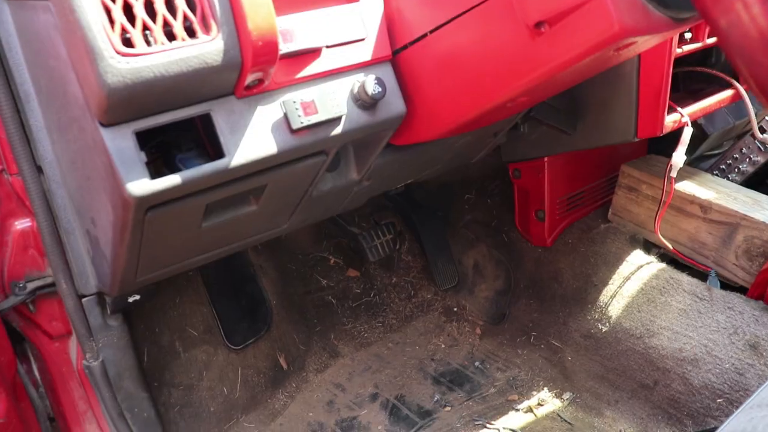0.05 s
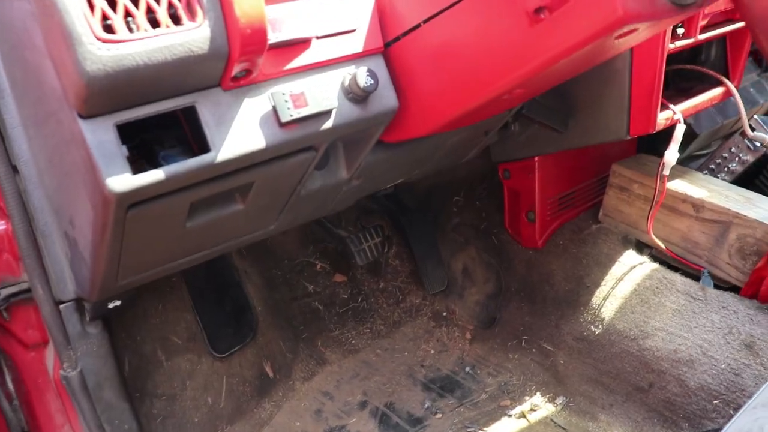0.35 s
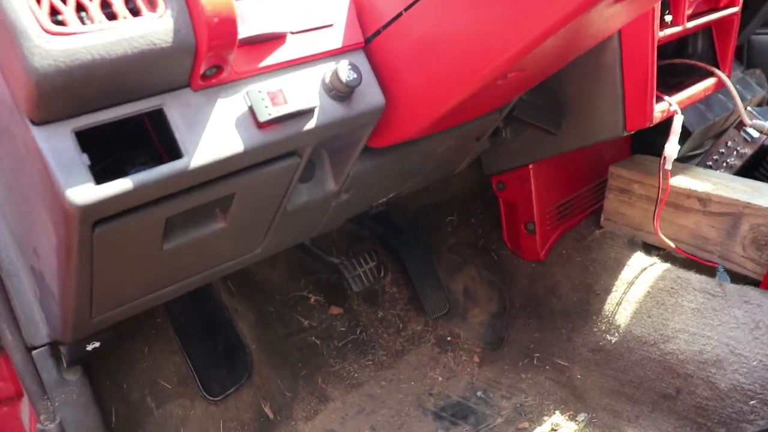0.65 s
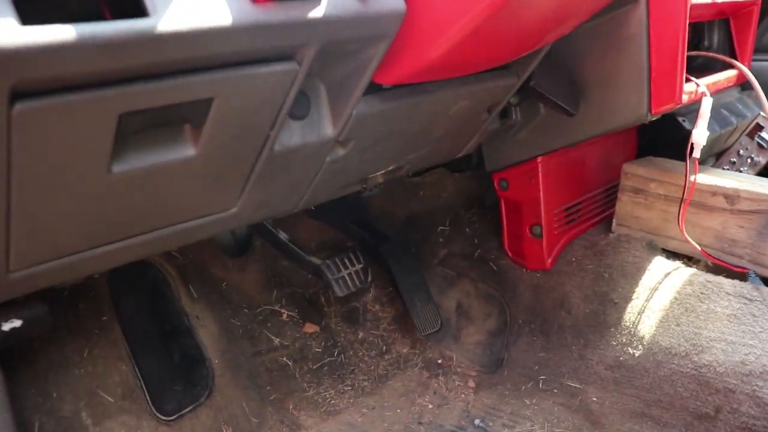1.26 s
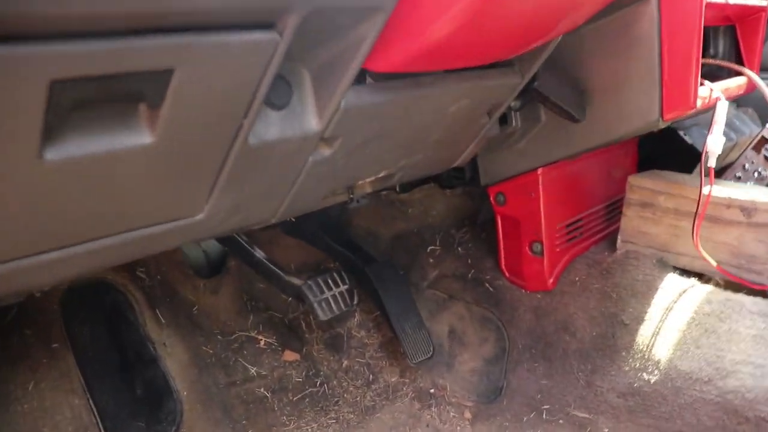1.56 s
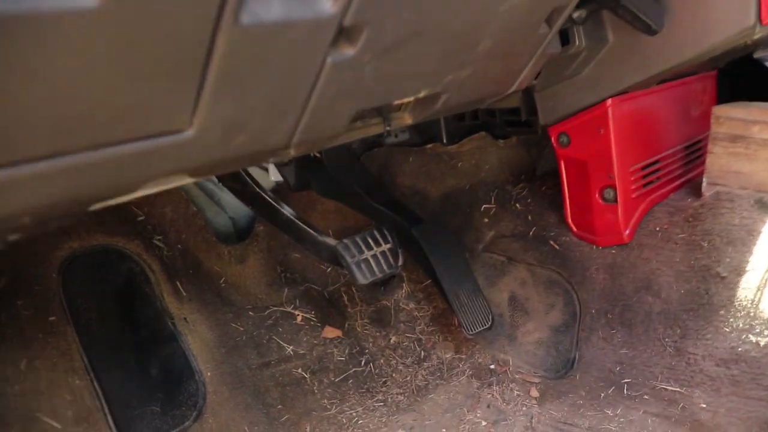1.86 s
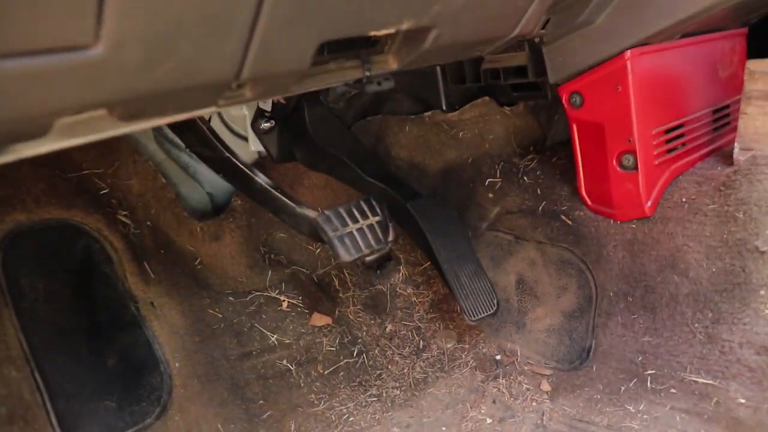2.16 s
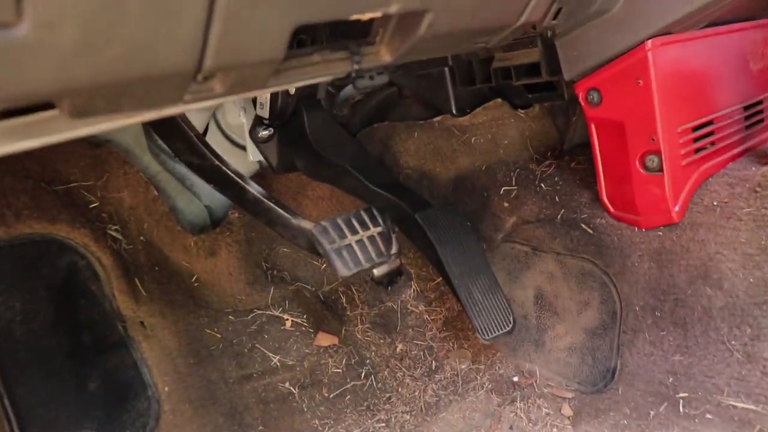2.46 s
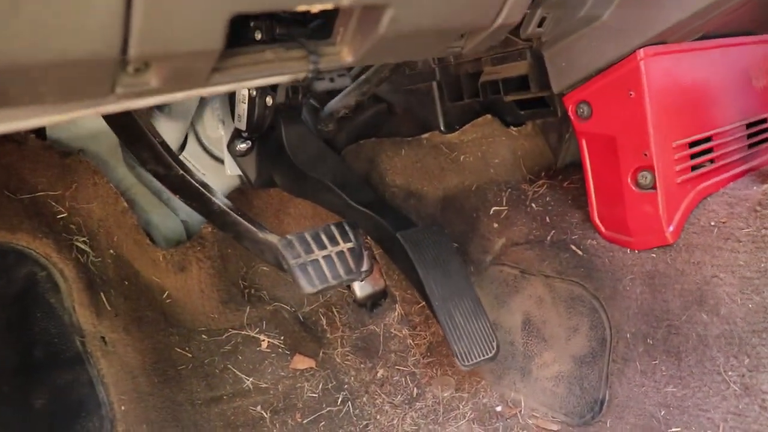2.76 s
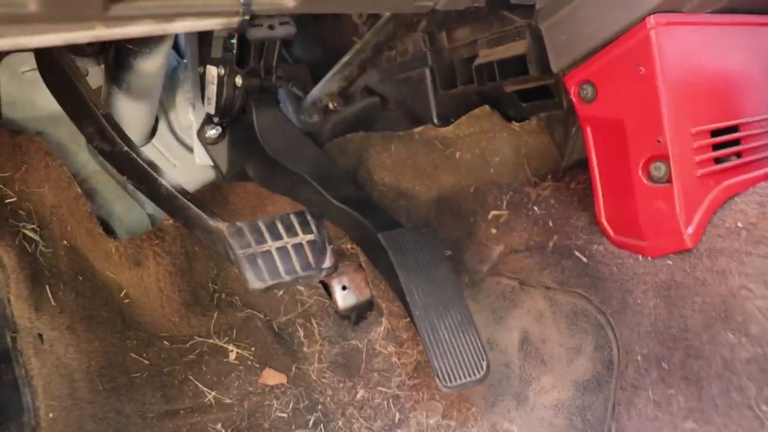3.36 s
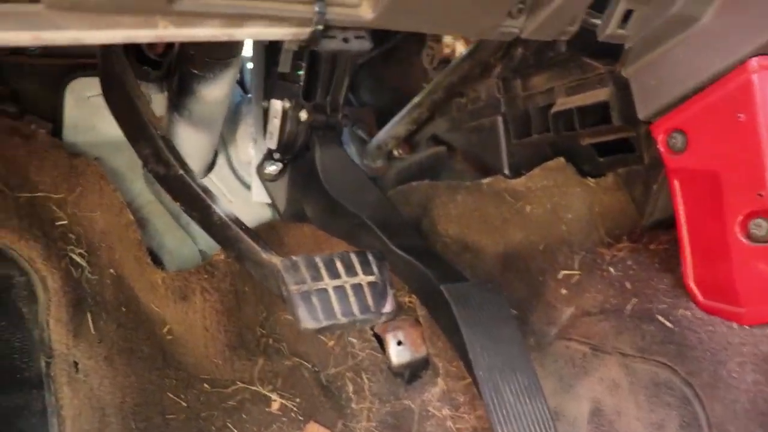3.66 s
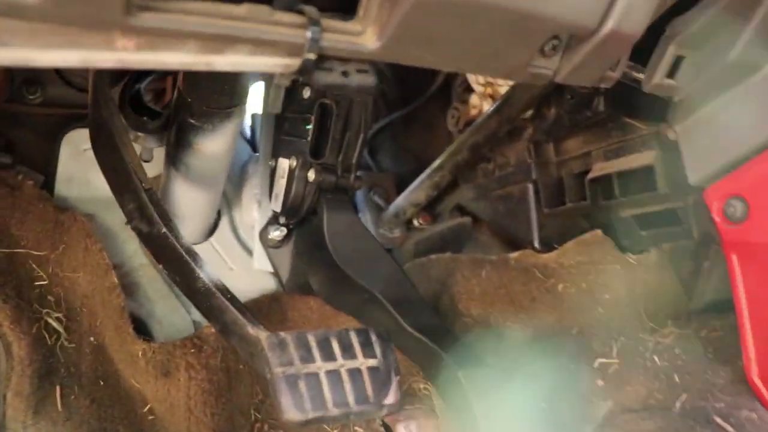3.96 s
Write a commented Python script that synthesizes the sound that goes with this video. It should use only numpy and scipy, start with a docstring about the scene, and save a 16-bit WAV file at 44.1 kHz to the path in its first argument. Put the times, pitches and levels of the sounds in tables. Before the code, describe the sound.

Sharp metallic ratchet clicks, slowing and hardening, come after a latch snap, a brief rolling slide and a padded thump inside a truck cab. Close microphone handling and rustling clothes open the scene, while a machine hums faintly nearby.

```python
"""Footwell of a parked truck; a machine hums nearby throughout. Fingers rub and tap the camera,
then clothes rustle, with two soft knocks. At 2 s a latch snaps open; something rolls along a rail,
clicks at its end and settles on a padded stop, booming a panel. From 3 s a pawl runs over ratchet
teeth, slowing as the clicks grow harder. Latch, rollers and pawl ring the same metal frame.
Last come a few small ticks and a faint scrape as the grip shifts."""
import sys
import numpy as np
from scipy import signal
from scipy.fft import rfft, irfft
from scipy.io import wavfile
from scipy.ndimage import uniform_filter1d

SR = 44100
rng = np.random.default_rng(int(sys.argv[2]) if len(sys.argv) > 2 else 0)


def int16_out(signal):
    """Quantize to a 16-bit WAV file."""
    q = np.round(np.clip(np.atleast_2d(signal).T, -1, 1) * 32767)
    wavfile.write(sys.argv[1], SR, q.astype(np.int16))


N = 176400
RING_SAMPLES, PORT_LAG_S, TOP_HZ, GRIT_DB = 27000, 0.0002, 15900, 2.5

# likeness of the two microphone ports: freq_hz, coherence
PORT_COHERENCE = [(60, 0.9), (1000, 0.96), (2000, 0.16), (4000, 0.03), (10000, 0.2)]
# machine hum: cycle_multiple, level_db
HUM_HARMONICS = [(4, -46), (5, -51), (7, -47.5), (8, -41), (9, -46.5)]
# hum swell: time_s, gain_db
HUM_SWELL = [(0, -6), (1.2, -0.5), (2.1, 1.5), (4, 4.5)]
# outdoor air: freq_hz, level_db
AIR_SPECTRUM = [(12, -67), (20, -45), (42, -2.5), (80, -6), (119, 0.5), (153, -6), (465, -14), (631, -16),
                (1870, -19.5), (3000, -27), (6360, -34), (15500, -47)]
# fingers rubbing: time_s, level_db, treble_db
RUB_STROKES = [(0.043, -32, -12), (.08, -37.5, -13), (.1, -41.5, -24), (.185, -40, -26), (.215, -34.5, -18),
               (0.236, -27.5, -9), (0.261, -29, -15), (0.305, -43.5, 1), (0.336, -37, 1.5),
               (0.359, -43, -7), (.425, -39.5, 1), (0.556, -32.5, -7.5), (.63, -49.5, -4.5),
               (0.684, -38, -5), (.78, -47, -2), (0.841, -48, 13.5), (.87, -64, 4)]
# skin friction: freq_hz, level_db
RUB_SPECTRUM = [(180, -7.5), (300, -7), (354, -7), (509, -15.5), (808, -1), (1460, -12.5), (1810, -13.5),
                (2440, -13), (4650, -11), (9140, -16), (15500, -33)]
# camera shell: freq_hz, width_hz, level_db
SHELL_MODES = [(832, 130, -10), (1847, 130, -13), (2300, 150, -24), (3320, 84, -17.5)]
# shell ring under finger pressure: time_s, gain_db
SHELL_DRIVE = [(.15, 3), (.26, 7.5), (.34, -5.5), (.8, -15)]
# taps: start_s, level_db, pitch_ratio, ring_ratio, pan_db
TAP_HITS = [(.3702, -2.5, 2.5, .4, -14), (.7798, 0, 1, .75, -16), (.8105, -14, .8, 2, -8),
            (3.8105, -14.5, 1, 1.8, 3), (3.879, -20, .75, 1.8, 0), (3.887, -20.5, 3.6, .4, 4)]
# tapped plastic: freq_hz, level_db, t60_s
PLASTIC_MODES = [(1280, -10, .011), (1750, -11, .007), (2400, -10, .009), (3150, -11, .008),
                 (3900, -15, .008), (5200, -21, .005)]
# clothes: time_s, level_db, treble_db
CLOTH_SWISHES = [(.85, -55.5, 21), (1.02, -48, 12.5), (1.15, -39.5, 2.5), (1.25, -51.5, 5),
                 (1.555, -38, -6), (1.577, -38, 17), (1.61, -43, 4), (1.661, -39.5, -8), (1.668, -26, 2),
                 (1.7, -42, 3), (1.77, -36.5, -3), (1.86, -49.5, -18), (2.66, -50, 11), (2.9, -74, 12),
                 (3.75, -47, 9), (3.83, -40, -7)]
# cloth friction: freq_hz, level_db
CLOTH_SPECTRUM = [(300, -4), (1100, 2.5), (2000, -1), (4000, -3.5), (6500, -11.5), (10000, -17.5),
                  (15500, -28)]
# shuffling on the seat: time_s, level_db
SEAT_LEVEL = [(1.25, -52), (1.35, -40), (1.68, -41.5), (1.75, -39), (1.82, -36), (1.9, -44.5), (2, -45)]
# seat friction: freq_hz, level_db
SEAT_SPECTRUM = [(100, -15), (200, 6.5), (500, -12), (1100, 1.5), (1600, -12), (4000, -49)]
# soft knocks: start_s, level_db, treble_db, crack_db
KNOCK_HITS = [(1.285, -12, 0, 10.5), (1.812, -16, -14, 10.5), (2.569, -4.5, 0, 6.5),
              (2.585, -1.5, -1.5, -18), (2.748, -23.5, -23, 11.5)]
# padded stop: freq_hz, crack_db, crack_t60_s, ring_db, ring_t60_s
PAD_BANDS = [(70, -60, .1, -30, 0.45), (168, -46, 0.17, -31, 0.6), (298, -33, 0.028, -30, 0.76),
             (696, -29, 0.32, -42, 0.44), (1460, -34, 0.071, -34.5, 0.48), (4500, -49, 0.072, -38, 0.23),
             (13000, -68, .05, -74, .2)]
# latch clicks: start_s, level_db, treble_db, crack_db
LATCH_HITS = [(1.9888, -0.5, -3, -2.5), (2.4405, -2.5, -17, -9)]
# latch body: freq_hz, crack_db, crack_t60_s, ring_db, ring_t60_s
LATCH_BANDS = [(120, -34, .05, -34, 0.35), (322, -21.5, 0.062, -36, 0.58), (710, -16, 0.063, -19.5, 0.17),
               (1090, -7.5, 0.061, -15.5, 0.15), (1970, -41, .04, -27.5, 0.31),
               (3220, -20, 0.035, -14, 0.091), (5070, -6.5, 0.053, -11.5, 0.12),
               (6460, -16, 0.058, -38, 0.16), (15000, -52, .025, -59, .08)]
# metal frame: freq_hz, struck_db, t60_s, rolled_db
FRAME_MODES = [(269, -31.5, 0.66, -69), (319.7, -25, 0.48, -34.5), (441.4, -28.5, 0.3, -62),
               (532.6, -29, 0.67, -61), (799, -30, 0.61, -60), (893, -23.5, 0.27, -67),
               (1047, -31.5, 0.51, -63), (1172, -39, 1, -34.5), (1298, -40.5, 0.65, -67),
               (1456, -38.5, 0.26, -66), (2440, -25, 0.28, -48), (2960, -22, 0.37, -52.5)]
# roller speed: time_s, turn_hz
ROLLER_SPEED = [(2.04, 110), (2.11, 100), (2.21, 102.5), (2.28, 116), (2.38, 97), (2.5, 110)]
# rolling: time_s, level_db
ROLL_LEVEL = [(2.045, -16), (2.08, -1), (2.12, -1), (2.245, -1), (2.28, -4), (2.345, -2.5), (2.41, -3),
              (2.44, -10), (2.5, -17), (2.54, -27)]
# rail: freq_hz, level_db
RAIL_SPECTRUM = [(53, -37), (90, -19), (118, -2), (167, -9.5), (322, 0.5), (387, -12), (439, -2),
                 (656, -7.5), (718, -3.5), (1150, -6), (1360, -15.5), (1890, -12.5), (2220, -25.5),
                 (4360, -29), (7000, -54), (15400, -115)]
# two rasping patches of rail: time_s, treble_db
RAIL_RASP = [(2.06, -1), (2.17, 14), (2.27, -2), (2.35, 11.5), (2.43, -1)]
# landing and bounce: start_s, level_db
THUD_HITS = [(2.571, -2.5), (2.585, 0)]
# panel at the stop: pitch_hz, level_db, t60_s
PANEL_MODES = [(185, -30.5, 0.4), (241, -31, .3), (288, -20, 0.19), (355, -33, 0.1), (404, -20.5, 0.094)]
# ratchet clicks: start_s, level_db, treble_db, crack_db
RATCHET_HITS = [(2.9945, -1, -38, -16), (3.0157, -5.5, 3.5, 6), (3.1178, 1, -21, -4.5),
                (3.1509, -1, -6, -5.5), (3.183, -4, -13.5, -15), (3.2098, -3.5, -4, -6.5),
                (3.2397, 0, -7, -4.5), (3.258, -12, -8, -16), (3.2712, -6, -2, -16), (3.3026, -5.5, -1, -1),
                (3.345, -2, -7, -0.5), (3.3919, -4.5, 1, 0.5), (3.4602, -1.5, -1.5, 0.5),
                (3.5266, -3.5, 0.5, 1), (3.6294, -4, 1, 4.5)]
# pawl on a tooth: freq_hz, crack_db, crack_t60_s, ring_db, ring_t60_s
PAWL_BANDS = [(118, -49, .05, -51, 0.52), (300, -23.5, 0.058, -34, 0.53), (590, -15, 0.042, -35.5, 1),
              (930, -14.5, 0.049, -32.5, 0.84), (1950, -19.5, 0.06, -26, 0.36),
              (2810, -16.5, 0.034, -18, 0.09), (4100, -5.5, 0.028, -16.5, 0.15),
              (5500, -8.5, 0.034, -16, 0.11), (6700, -19, 0.03, -23.5, 0.11),
              (8850, -5.5, 0.021, -29.5, 0.15), (9750, -22.5, 0.069, -47, 0.19),
              (12800, -16, 0.051, -36, 0.18), (14100, -27, .025, -48, .08)]
# pawl and bracket resonances: freq_hz, width_hz, boost_db
PAWL_MODES = [(1458, 47, 7.5), (2570, 150, 9.5), (2940, 99, 11.5), (3670, 190, 6), (4340, 190, 5),
              (4760, 98, 6), (5100, 220, 5), (5730, 130, 10), (6700, 200, 3), (8060, 330, 2),
              (8960, 450, 3)]
# teeth dragging under the pawl: time_s, level_db
DRAG_LEVEL = [(3.115, -38), (3.18, -26), (3.29, -32), (3.55, -42), (3.69, -32), (3.75, -43.5)]
# tooth friction: freq_hz, level_db
DRAG_SPECTRUM = [(200, -14), (320, -7), (600, -5), (830, -1), (1450, -7), (2500, -17), (5000, -25),
                 (9000, -46)]
# grip scrape: time_s, level_db
SCRAPE_LEVEL = [(3.905, -47), (3.95, -43.5), (3.965, -40.5), (4, -40.5)]
# scraped shell: freq_hz, width_hz, level_db
SCRAPE_MODES = [(1970, 240, 0), (2380, 410, 2), (4100, 790, -2)]
# mechanism, left minus right: freq_hz, pan_db
MECHANISM_PAN = [(100, -0.5), (1100, 2.5), (2200, -1), (4300, 1), (6000, 0.5), (9000, 6), (13000, 3)]


def undb(db):
    """Decibels to gain."""
    return 10 ** (np.asarray(db) / 20)


def unit(x):
    """Scale to rms 1."""
    return x / np.sqrt(np.mean(x ** 2))


def envelope(rows, fade_s=.025):
    """Gain through (time_s, level_db) points, fading outside them."""
    time_s, db = np.array(rows).T
    t = np.arange(N) / SR
    outside_s = np.abs(t - np.clip(t, time_s[0], time_s[-1]))
    return undb(np.interp(t, time_s, db)) * np.exp(-outside_s / fade_s)


def log_interp(f, hz, values):
    """Interpolate over log frequency."""
    return np.interp(np.log(f + 1), np.log(hz), values)


def pan(db):
    """Stereo gains for a left-minus-right level."""
    return undb(np.vstack([db, -db]) / 2)


def wander(rate_hz):
    """Smooth random motion, rms 1."""
    hold = max(int(SR / rate_hz), 2)
    steps = rng.standard_normal(N)[np.arange(N) // hold]
    return unit(uniform_filter1d(uniform_filter1d(steps, hold), hold))


def sine(cycles):
    """Sine with a random start phase."""
    return np.sin(2 * np.pi * (cycles + rng.random()))


def port_spectra(size):
    """White noise spectra at both ports: alike in the bass, the right one late."""
    f = np.fft.rfftfreq(size, 1 / SR)
    white = rfft(rng.standard_normal((3, size)))
    shared = np.clip(log_interp(f, *np.array(PORT_COHERENCE).T), 0, 1)
    pair = np.sqrt(shared) * white[0] + np.sqrt(1 - shared) * white[1:]
    return pair * np.exp(-2j * np.pi * f * np.array([[0], [PORT_LAG_S]]))


def tint(white, colour):
    """White spectrum to a signal of (freq_hz, level_db) colour, rms 1."""
    f = np.fft.rfftfreq(N, 1 / SR)
    hz, db = np.array(colour).T
    low_cut = 1 / np.sqrt(1 + (hz[0] / (f + 1)) ** 6)
    return unit(irfft(white * undb(log_interp(f, hz, db)) * low_cut, N))


def noise(colour):
    """Coloured stereo noise."""
    return tint(port_spectra(N), colour)


def resonate(x, modes):
    """Sum of driven (freq_hz, width_hz, level_db) resonances."""
    return sum(undb(db) * unit(signal.lfilter(*signal.iirpeak(hz, hz / width_hz, fs=SR), x))
               for hz, width_hz, db in modes)


def brighten(x, rows, corner_hz):
    """Treble shelf following (time_s, treble_db) points."""
    treble = signal.sosfiltfilt(signal.butter(1, corner_hz, "high", fs=SR, output="sos"), x)
    return x + treble * (envelope(rows) - 1)


def add(out, start_s, x):
    """Mix x in at start_s."""
    i = int(start_s * SR)
    out[:, i:i + x.shape[1]] += x[:, :N - i]


def background(cycle_hz=14.82, drift=0.003, waver_db=2, air_db=-39.5):
    """A machine hums on multiples of its cycle over quiet outdoor air."""
    cycles = np.cumsum(cycle_hz * (1 + drift * wander(2.9))) / SR
    hum = sum(undb(db + waver_db * wander(7.37)) * np.sqrt(2) * sine(k * cycles)
              for k, db in HUM_HARMONICS)
    return hum * envelope(HUM_SWELL) + undb(air_db) * noise(AIR_SPECTRUM)


def fingers(catches_per_s=1300, spread_db=2.5, catch_share=.55, gain_db=2.5, pan_db=-11.5):
    """Skin slides and catches on the shell by the right port; light strokes are brighter."""
    strokes = np.array(RUB_STROKES)
    catches = (rng.random(N) < catches_per_s / SR) * undb(spread_db * rng.standard_normal(N))
    catches = unit(catches * rng.choice([-1, 1], (2, N)))
    slide = unit(rng.standard_normal((2, N)) * undb(GRIT_DB * wander(1500)))
    force = np.sqrt(catch_share) * catches + np.sqrt(1 - catch_share) * slide
    shell = resonate(force, SHELL_MODES) * envelope(SHELL_DRIVE)
    scratch = brighten(tint(rfft(force), RUB_SPECTRUM), strokes[:, [0, 2]], corner_hz=5000)
    return (scratch + shell) * envelope(strokes[:, :2]) * undb(gain_db) * pan(pan_db)


def taps(snap_db=-17, snap_s=.0007, base_low_hz=1000, base_high_hz=6500):
    """Dry ticks of plastic: a snap and a few modes, no bass."""
    out, t = np.zeros((2, N)), np.arange(SR // 20) / SR
    for start_s, level_db, pitch, ring, pan_db in TAP_HITS:
        modes = sum((hz * pitch < TOP_HZ) * undb(db - 60 * t / (t60_s * ring)) * sine(hz * pitch * t)
                    for hz, db, t60_s in PLASTIC_MODES)
        hiss = uniform_filter1d(rng.standard_normal((2, len(t))), size=3)
        snap = undb(snap_db) * np.exp(-t / snap_s) * hiss
        highpass = signal.butter(4, base_low_hz * pitch, "high", fs=SR, output="sos")
        lowpass = signal.butter(2, min(base_high_hz * np.sqrt(pitch), TOP_HZ), fs=SR)
        tick = signal.lfilter(*lowpass, signal.sosfilt(highpass, modes + snap))
        add(out, start_s, undb(level_db) * tick * pan(pan_db) / 2)
    return out


def clothes(grain_db=1.5):
    """Cloth brushes and weight shifts as someone leans in; quick swishes are brighter."""
    swishes = np.array(CLOTH_SWISHES)
    brush = brighten(noise(CLOTH_SPECTRUM), swishes[:, [0, 2]], corner_hz=8500)
    shuffle = noise(SEAT_SPECTRUM) * envelope(SEAT_LEVEL)
    return (brush * envelope(swishes[:, :2]) + shuffle) * unit(undb(grain_db * wander(150)))


def attack_noise(t, early_s=0.0096, smooth_hz=200):
    """Stereo noise, its broad colour flattened over the first milliseconds."""
    white = port_spectra(len(t))
    early_power = np.abs(rfft(irfft(white, len(t)) * np.exp(-t / early_s))) ** 2
    smoothed = uniform_filter1d(early_power, int(smooth_hz * len(t) / SR))
    return irfft(white * np.sqrt(early_s * SR / 2 / smoothed), len(t))


def strikes(hits, body, frame_db=None, peaks=(), contact_s=0.00017, treble_hz=2390):
    """Blows: a crack and a ring of crowded modes, plus the frame's modes if frame_db is set."""
    out, t = np.zeros((2, N)), np.arange(RING_SAMPLES) / SR
    f = np.fft.rfftfreq(RING_SAMPLES, 1 / SR)
    attack = attack_noise(t)
    share = .85 * np.exp(-t / .03)  # attacks alike, tails differ
    band_hz, crack_db, crack_t60_s, ring_db, ring_t60_s = np.array(body).T[:, :, None]
    bands = np.array([log_interp(f, band_hz[:, 0], row) for row in np.eye(len(body))])
    # equal power per octave, cut below the lowest band
    bands *= np.sqrt(SR / 2 / np.log(2) / (f + 1) / (1 + (band_hz[0] / (f + 1)) ** 6))
    bands *= undb(sum(db * np.exp(-2 * ((f - hz) / width_hz) ** 2) for hz, width_hz, db in peaks))
    crack = undb(crack_db - 60 * t / crack_t60_s)
    ring = undb(ring_db - 60 * t / ring_t60_s)
    mode_hz, mode_db, mode_t60_s, _ = np.array(FRAME_MODES).T[:, :, None]
    modes = undb(mode_db - 60 * t / mode_t60_s) * np.exp(2j * np.pi * mode_hz * t)
    phase = rng.random((len(FRAME_MODES), 1)) - mode_hz * np.array([0, PORT_LAG_S])
    for start_s, level_db, treble_db, extra_crack_db in hits:
        tilt = lambda hz: undb(treble_db * hz ** 2 / (hz ** 2 + treble_hz ** 2))
        fresh = irfft(port_spectra(RING_SAMPLES), RING_SAMPLES)
        spectrum = rfft(np.sqrt(share) * attack + np.sqrt(1 - share) * fresh)
        decay = np.hypot(crack * undb(extra_crack_db), ring)
        blow = (irfft(spectrum[:, None] * bands, RING_SAMPLES) * decay * tilt(band_hz)).sum(1)
        if frame_db is not None:
            weights = np.exp(2j * np.pi * phase) * tilt(mode_hz)
            blow += undb(frame_db) * (weights.T @ modes).imag
        add(out, start_s, undb(level_db) * blow * (1 - np.exp(-t / contact_s)))
    return out


def knocks():
    """Soft blows on a padded stop."""
    return strikes(KNOCK_HITS, PAD_BANDS)


def latch():
    """A snap on opening, a click at the rail's end; both ring the frame."""
    return strikes(LATCH_HITS, LATCH_BANDS, frame_db=-3.5)


def whirr(jitter=0.0024):
    """Roller turns repeat: a buzz of harmonics in the rail's colour."""
    out, t = np.zeros((2, N)), np.arange(N) / SR
    moving = (t > ROLL_LEVEL[0][0]) & (t < ROLL_LEVEL[-1][0])
    turn_hz = (np.interp(t, *np.array(ROLLER_SPEED).T) * (1 + jitter * wander(40.04)))[moving]
    turns = np.cumsum(turn_hz) / SR - turn_hz * np.array([[0], [PORT_LAG_S]])
    rail = np.array(RAIL_SPECTRUM).T
    buzz = sum(undb(log_interp(k * turn_hz, *rail)) * sine(k * turns) for k in range(1, 21))
    out[:, moving] = unit(buzz)
    return out


def rolling(rough_db=0.5, rumble_db=-26.5, whirr_db=-24):
    """Rollers whirr and bump along the rail and keep the frame ringing."""
    bumps = undb(rough_db * wander(110))
    force = noise([(100, 0), (9000, 0)]) * bumps
    modes = [(hz, 2 * np.log(1000) / np.pi / t60_s, db) for hz, _, t60_s, db in FRAME_MODES]
    frame = resonate(force, modes)
    rumble = brighten(unit(noise(RAIL_SPECTRUM) * bumps), RAIL_RASP, corner_hz=3000)
    return (undb(rumble_db) * rumble + frame + undb(whirr_db) * whirr()) * envelope(ROLL_LEVEL)


def thud(octave_drop_s=0.48, rise_s=0.002):
    """The settling part bounces once and booms a panel, whose pitch sinks as it relaxes."""
    out, t = np.zeros((2, N)), np.arange(RING_SAMPLES) / SR
    slowed_s = octave_drop_s * np.log1p(t / octave_drop_s)
    for start_s, level_db in THUD_HITS:
        boom = sum(undb(db - 60 * t / t60_s) * sine(hz * slowed_s) for hz, db, t60_s in PANEL_MODES)
        add(out, start_s, (undb(level_db) * boom * (1 - np.exp(-t / rise_s)))[None])
    return out


def ratchet(rebound_s=.023, chatter_db=4, chatter_hz=260):
    """The pawl snaps into each tooth and rebounds, softer and duller; teeth drag and chatter."""
    rebounds = [(start_s + rebound_s * (1 + .1 * rng.standard_normal()), db - 6, treble_db - 17, -19)
                for start_s, db, treble_db, _ in RATCHET_HITS[1:]]
    drag = unit(noise(DRAG_SPECTRUM) * undb(chatter_db * wander(chatter_hz))) * envelope(DRAG_LEVEL)
    return strikes(RATCHET_HITS + rebounds, PAWL_BANDS, frame_db=-3.5, peaks=PAWL_MODES) + drag


def scrape(pan_db=-5):
    """The grip shifts: uneven slips ring the shell."""
    slips = rng.standard_normal((2, N)) * undb(GRIT_DB * wander(400))
    return unit(resonate(slips, SCRAPE_MODES)) * envelope(SCRAPE_LEVEL) * pan(pan_db)


def scene():
    """Mechanism slightly left, plus handling and background."""
    mechanism = ratchet() + latch() + knocks() + thud() + rolling()
    pan_db = log_interp(np.fft.rfftfreq(N, 1 / SR), *np.array(MECHANISM_PAN).T)
    placed = irfft(rfft(mechanism) * pan(pan_db), N)
    return placed + fingers() + scrape() + taps() + clothes() + background()


def record(dry):
    """Soft clip, then steep low-pass."""
    soft = dry / (1 + dry ** 6) ** (1 / 6)
    return signal.sosfilt(signal.ellip(8, .2, 70, TOP_HZ, fs=SR, output="sos"), soft)


dry = scene()
out = record(dry)
int16_out(out)
```